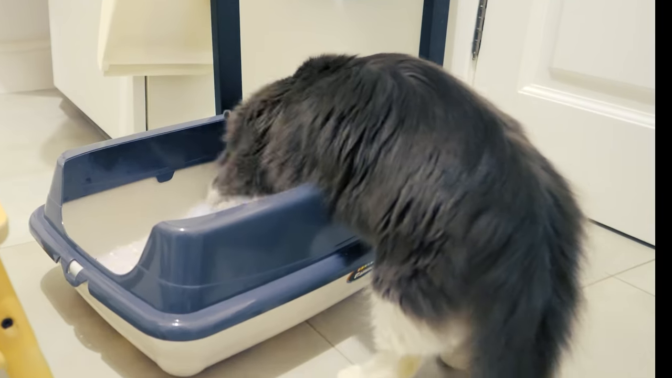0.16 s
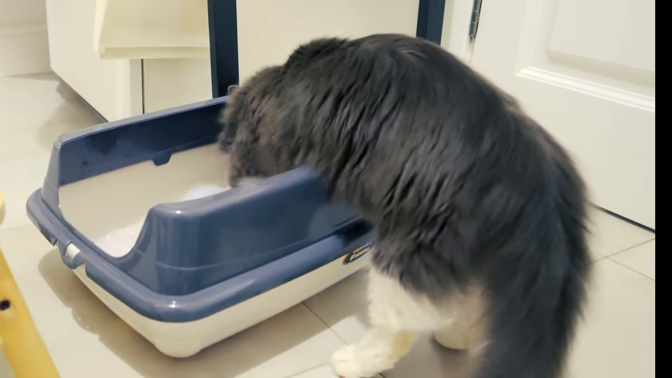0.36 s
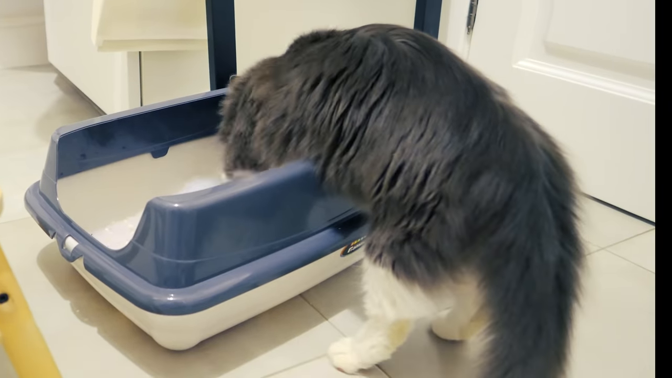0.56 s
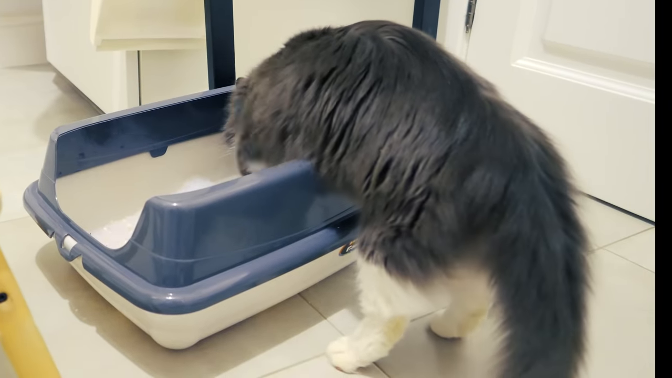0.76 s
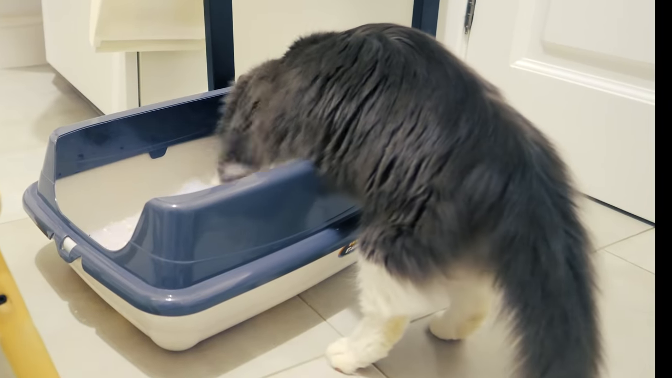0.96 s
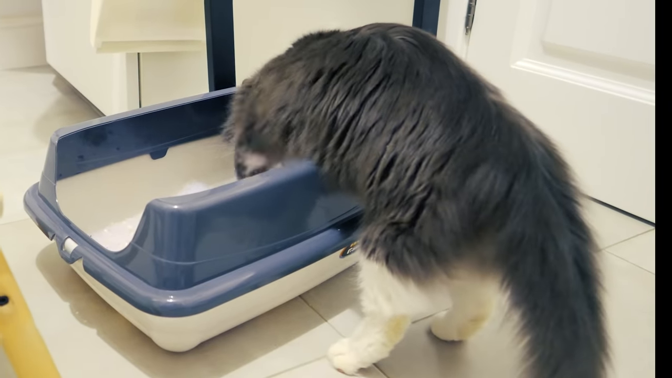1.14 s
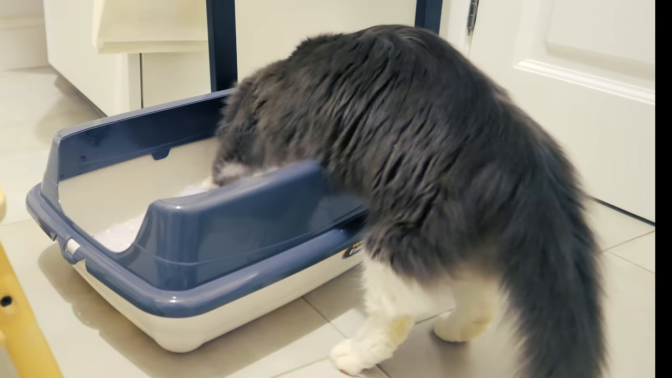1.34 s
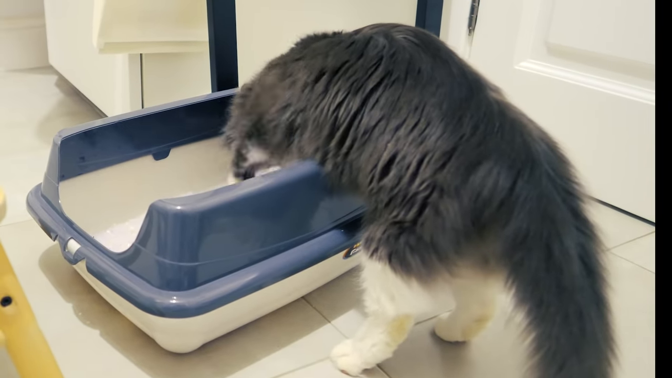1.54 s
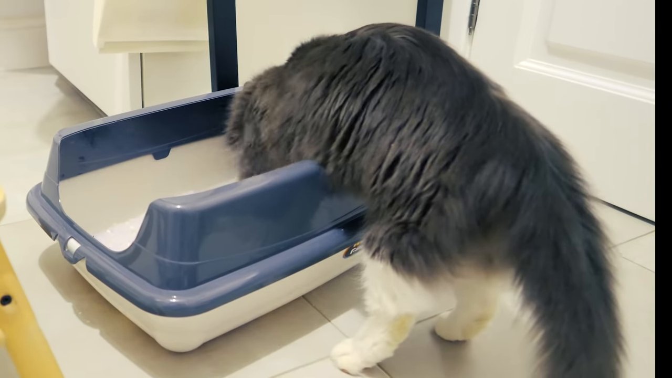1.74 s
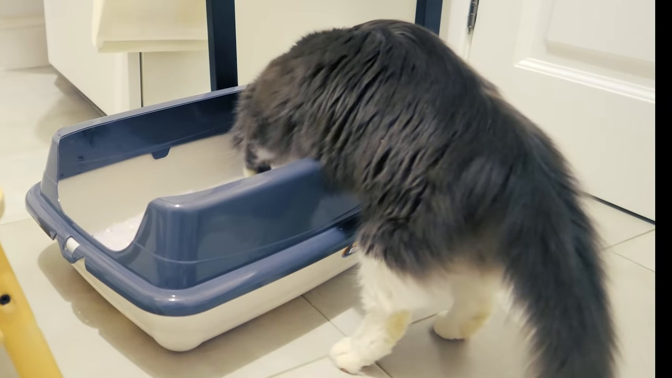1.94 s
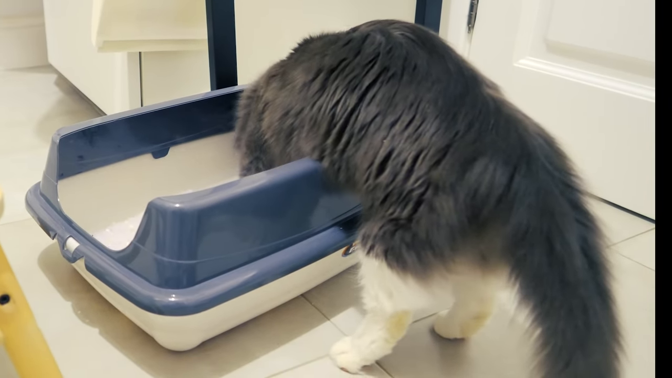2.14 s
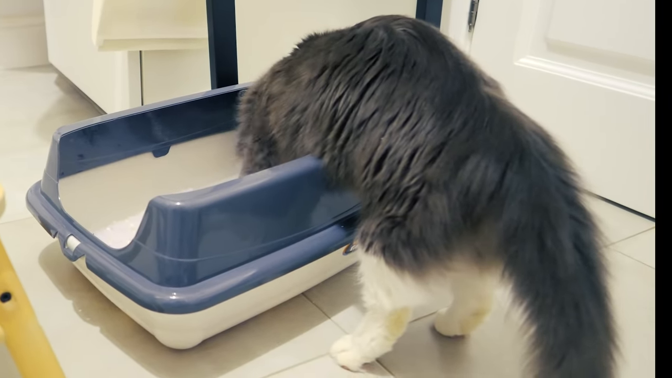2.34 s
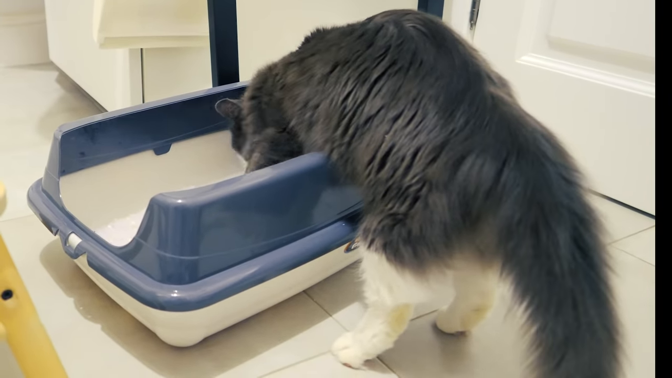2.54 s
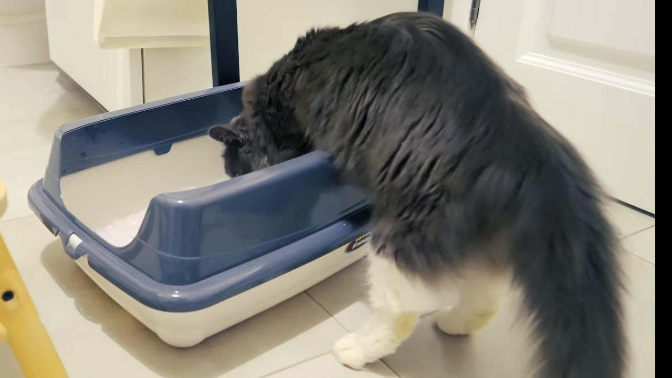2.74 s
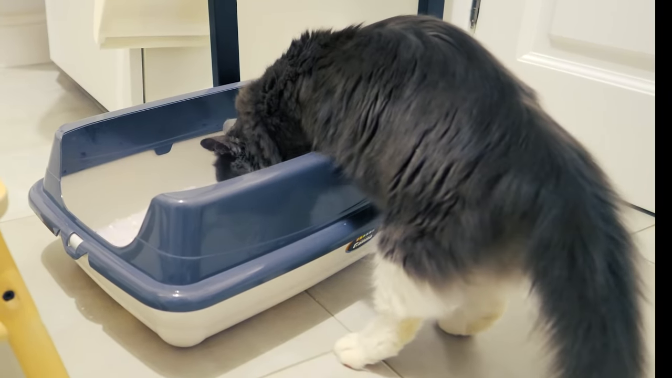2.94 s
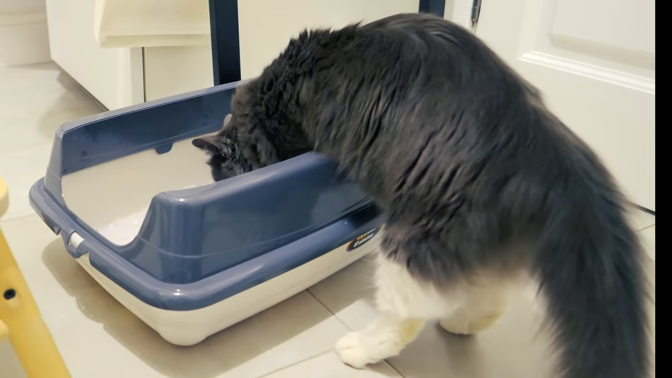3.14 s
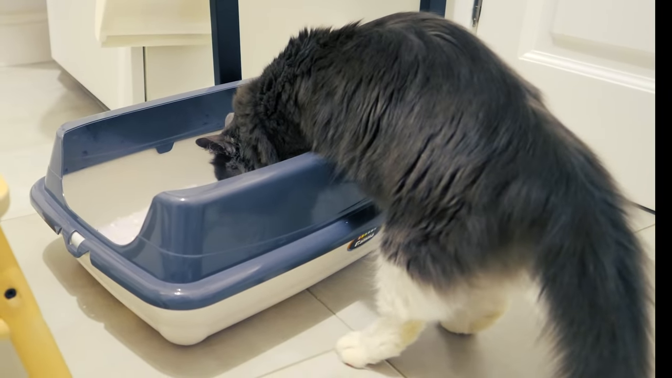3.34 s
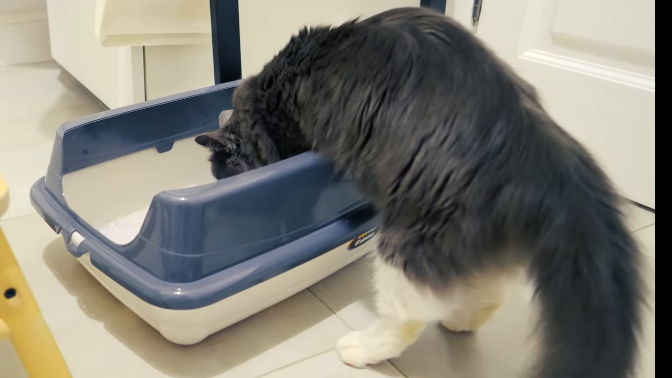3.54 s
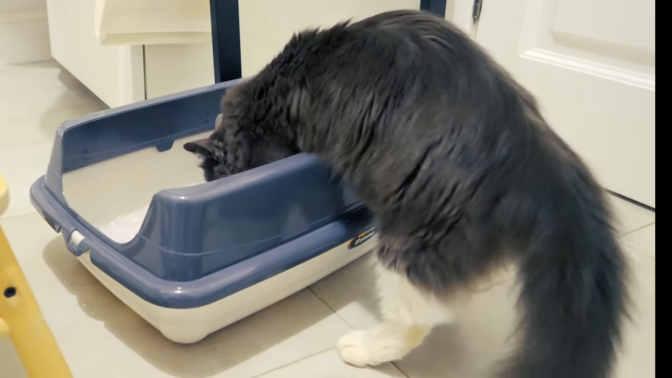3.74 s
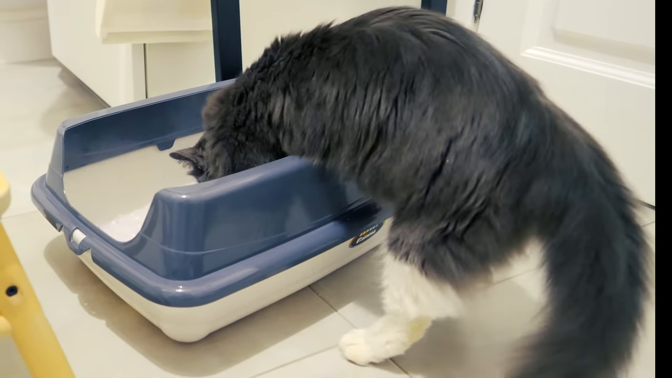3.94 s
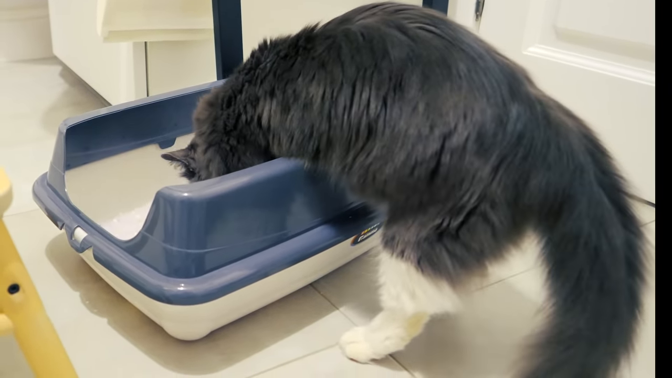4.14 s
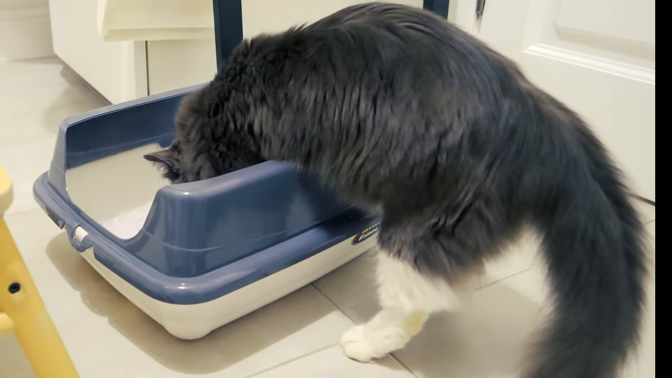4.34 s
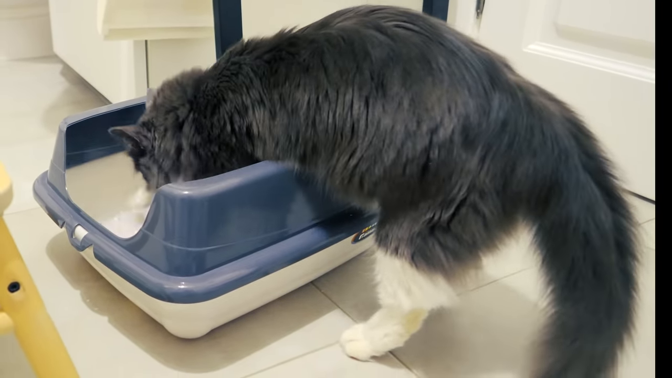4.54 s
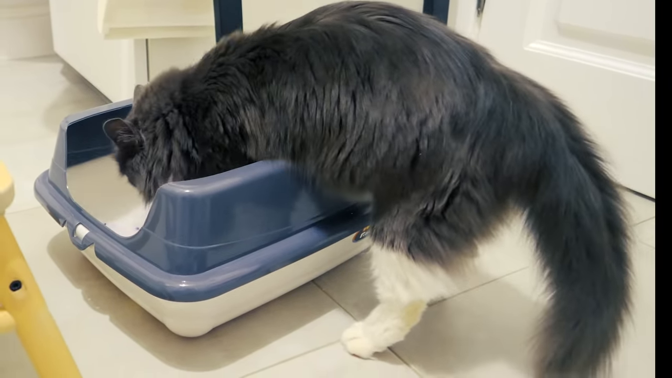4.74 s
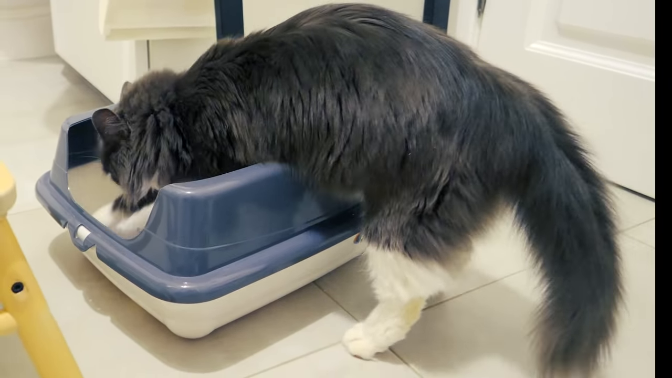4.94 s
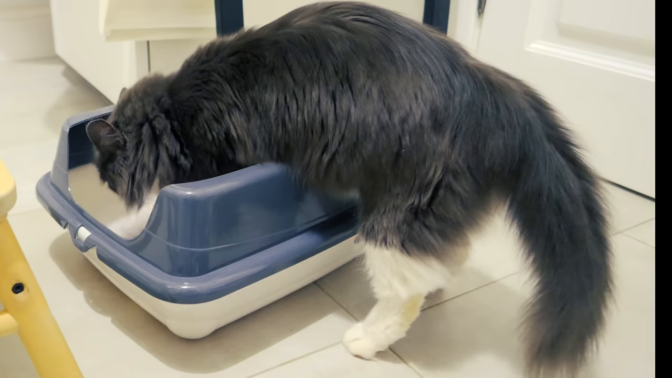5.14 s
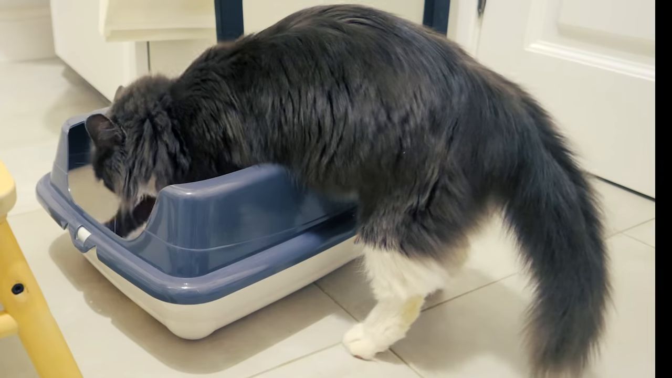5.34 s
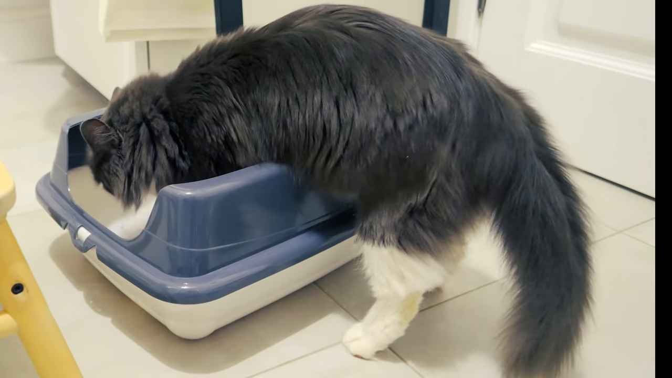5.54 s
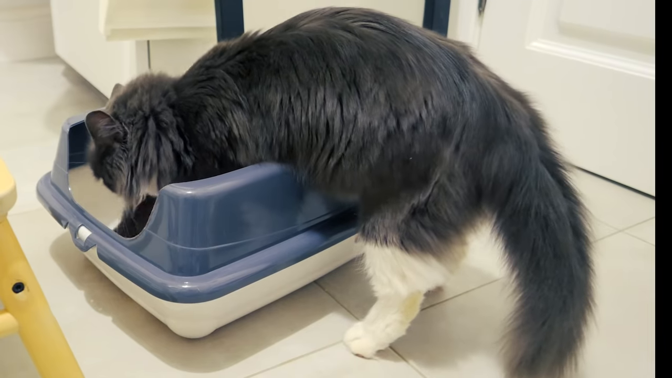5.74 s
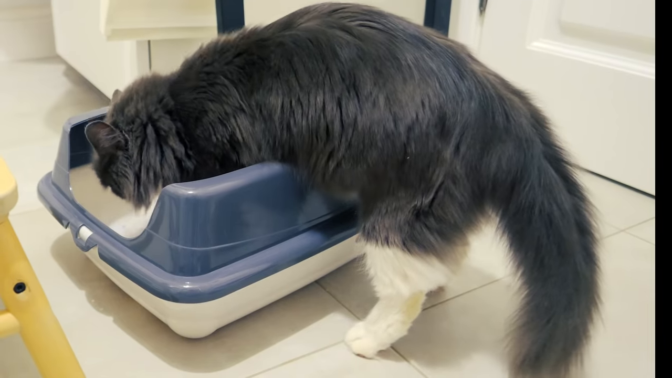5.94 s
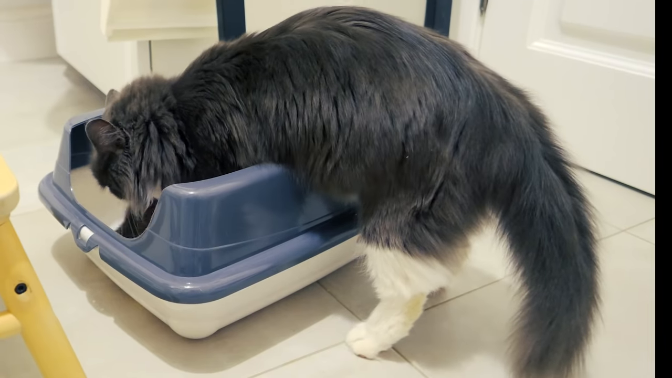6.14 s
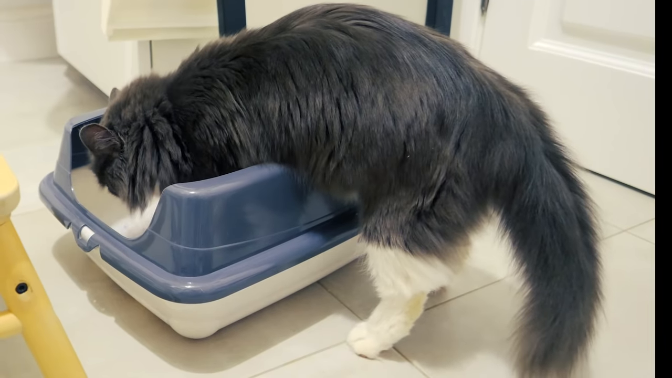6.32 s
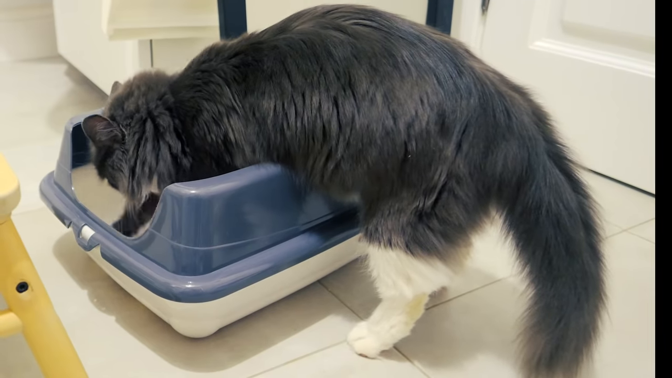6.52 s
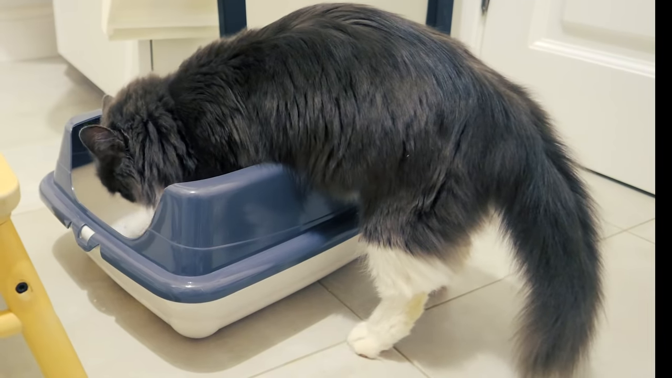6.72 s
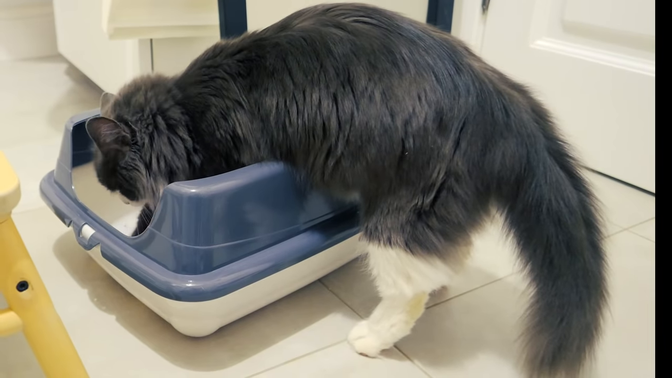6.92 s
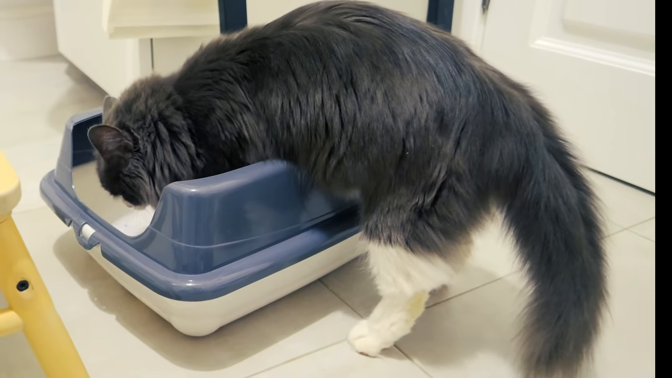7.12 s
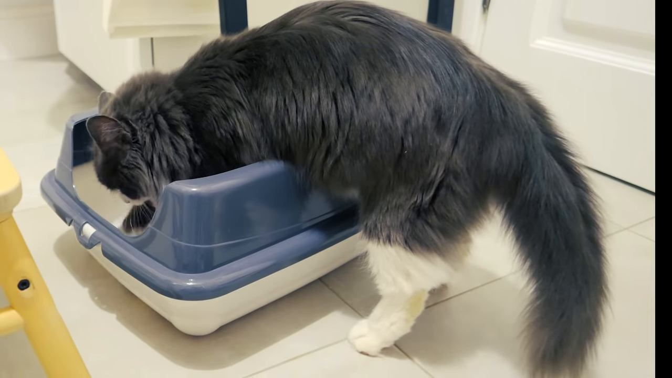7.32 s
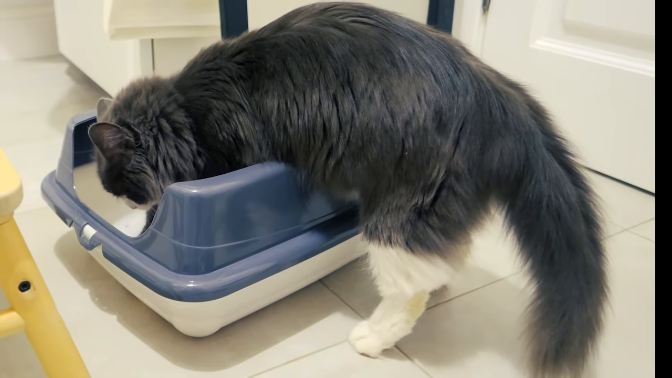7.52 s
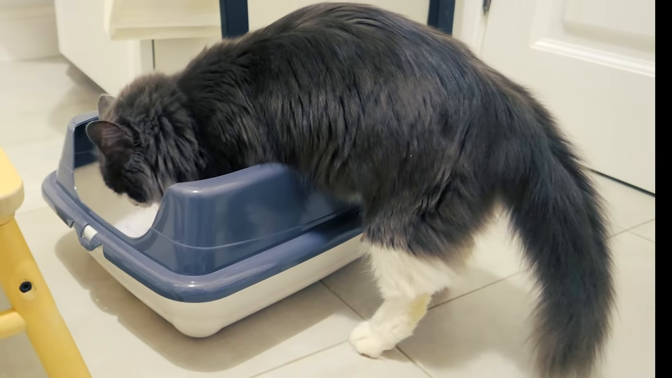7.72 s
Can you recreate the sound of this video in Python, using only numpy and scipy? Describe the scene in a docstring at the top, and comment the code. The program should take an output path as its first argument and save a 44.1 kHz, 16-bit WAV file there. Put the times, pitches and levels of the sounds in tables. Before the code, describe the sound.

A cat's paws rake dry, glassy granules about three times a second, with low hollow knocks from the plastic tray. It stops for over a second, sniffing softly while stray crystals tick, then tentatively prods and digs again, louder and more irregular, with hard cracks. Heard close in stereo, in a small reflective indoor room with a quiet background.

```python
"""Cat digging in crystal litter.

A cat digs in a plastic tray in a small tiled room, pauses to sniff and nudge, then digs at the far end.
Strokes are dense random collisions; pressure drives the tray's low modes, crushing adds bright treble.
Paw landings and single snaps are fading grain showers, sniffs are shaped noise; hard walls add a short tail.
"""
import sys
import numpy as np
from scipy import signal
from scipy.fft import rfft, irfft, next_fast_len
from scipy.io import wavfile

SR = 44100
rng = np.random.default_rng(int(sys.argv[2]) if len(sys.argv) > 2 else 0)


def int16_out(signal):
    """Quantize to a 16-bit WAV file."""
    q = np.round(np.clip(np.atleast_2d(signal).T, -1, 1) * 32767)
    wavfile.write(sys.argv[1], SR, q.astype(np.int16))


N = 347067
T = np.arange(N) / SR

# All source levels are before the output gain in scene().
# Still room air. Each row: frequency in Hz, relative density in dB per Hz.
AIR_COLOUR = [(30, -27), (60, -40), (100, 0), (300, 1), (580, -0.5), (1140, -7), (1650, -31), (3070, 1),
              (4300, -11.5), (9600, -12), (15000, -23)]
AIR_DB = -69.5
# Room decay. Each row: frequency in Hz, t60 in seconds.
ROOM_T60 = [(150, 0.51), (1000, 0.51), (3000, 0.3), (8000, 0.38), (15000, 0.31)]
# Difference between the two ports. Each row: frequency in Hz, side minus mid in dB.
PORT_WIDTH = [(30, 10), (100, -12), (260, -15.5), (550, -10), (1100, -4), (2400, -5.5), (5000, -3.5),
              (9000, -7), (13000, 0.5)]
# Sniffs. Each row: centre in seconds, level in dB, Gaussian half length in seconds.
SNIFFS = [(2.862, -64, 0.016), (3.058, -64, 0.023), (3.14, -61, 0.019), (3.233, -58.5, 0.016),
          (3.336, -52, 0.013)]
# Air drawn through the small nose. Each row: frequency in Hz, relative level in dB.
NOSE_COLOUR = [(100, -24), (350, -1), (900, -2.5), (1600, 1), (2300, -4), (3000, 3), (4200, -8),
               (7000, -19), (15000, -30)]
# One collision in the bed. Each row: frequency in Hz, relative level in dB.
LITTER_COLOUR = [(40, -56), (100, -23.5), (195, -20), (260, -8), (480, -13.5), (900, -7.5), (1600, 0),
                 (3100, 2.5), (4300, -5), (7000, -12), (9500, -13), (12000, -19.5), (15500, -27.5)]
# Tray walls and the crystals on them. Each row: resonance in Hz, width in Hz, lift in dB.
WALL_MODES = [(355.5, 65, 5.5), (443, 22, 6.5), (913, 27, 6), (1165, 37, 1.5), (1154, 17, 0.5),
              (1301, 35, 3), (1510, 30, -2.5), (1745, 130, 2), (2220, 58, 0.5), (2475, 90, 2),
              (2660, 85, -1), (2920, 41, 1.5)]
# Tray floor. Each row: resonance in Hz, width in Hz, lift in dB at a drum share of 1.
DRUM_MODES = [(261.4, 67, 10), (314, 15.5, 11.5), (666, 224, 9.5)]
# Single crystals snap or drop. Each row: start in seconds, level in dB, bright crunch in relative dB,
# tray drive in relative dB, ring in Hz.
SNAPS = [(0.0568, -59, -4, -16, 3000), (0.2882, -47, 1, -8, 3000), (2.496, -43, -9, -9, 2530),
         (2.6222, -46, 5.5, -26, 3100), (2.6796, -48, -7, -23, 3030), (2.819, -51.5, 5.5, 3, 1630),
         (2.9164, -44, 8, 1, 3100), (3.1522, -51, 1, -1, 2900), (3.417, -43, 4, -7, 3020),
         (3.486, -42.5, 2, -14, 3120), (3.5336, -35, 5, -9, 2800), (3.6838, -47, 1, -10, 2670),
         (4.1865, -32.5, 7, -8, 2920), (4.2369, -29, 4, -29, 2930), (4.4672, -37, 6, -2, 2360),
         (5.3664, -30.5, -21, 10.5, 1990), (5.4319, -18.5, 1, 4.5, 2620), (6.2098, -21, 4, 1.5, 3130),
         (6.316, -21, -23, -19, 1700), (6.391, -19, 0, -18, 3000), (6.555, -39, 5.5, 5, 3080),
         (6.693, -27, 6, -31, 3870), (7.0904, -17, -1, 1, 1720), (7.4048, -31, -3, 5.5, 1820)]
# The paw lands or bears down. Each row: start in seconds, level in dB, bright crunch in relative dB,
# tray drive in relative dB.
PAWS = [(0.354, -40, -12, 13.5), (0.6775, -36.5, -19, 13), (0.9848, -26.5, 10.5, -11),
        (1.039, -29, -11, 12), (1.344, -29, 14.5, 6.5), (1.4026, -21.5, -8, 12.5), (1.6726, -25.5, 5, -19),
        (2.0721, -28, 9.5, 3), (2.0852, -30, 11, 7.5), (2.1317, -22, 0, -22), (2.177, -22, 5.5, -11),
        (2.2006, -24.5, 7, 5), (2.3408, -31, 2.5, -11), (3.9378, -24, -8, -38), (5.3907, -25, 6, 0),
        (5.7765, -20.5, -23, 5), (6.614, -40, 7, -16), (6.785, -37.5, -8, 13.5), (6.9833, -24, -6, 5.5)]
# Paw drags, and one faint long nudge of the nose in the pause. Each row: start in seconds,
# sinking-in in seconds, drag length in seconds, peak in dB, swell from first touch in dB,
# settling in dB per second, bright crunch in dB, push on the tray in dB, scrape on the tray floor in dB.
STROKES = [(0.349, 0.0097, 0.12, -35, 9, 136, 2, -0.5, 1), (0.681, 0.02, 0.11, -29, 9.5, 88, 0.5, 0, -2),
           (0.981, 0.018, .03, -31, 2.5, 95, 5.5, 2, 1), (1.077, 0.015, 0.11, -31, 0.5, 85, 0.5, -4, -4),
           (1.343, 0.018, 0.049, -24.5, 3, 77.5, 4, -0.5, -1),
           (1.678, 0.023, 0.12, -34.5, 11, 122, 4, 1.5, 2.5),
           (1.859, 0.047, 0.061, -33, 4.5, 109, 1, -0.5, -2.5),
           (2.067, .005, 0.13, -35.5, 12.5, 148, 5.5, 1, 1),
           (2.355, 0.0036, 0.027, -51.5, 1, 85, 3.5, -23, -2), (2.94, .04, 0.62, -66, 11, 30, 4, 0, 2.5),
           (3.801, 0.017, .012, -41, -1.5, 89, -0.5, -10.5, -4),
           (3.918, .006, 0.016, -38.5, 9, 132, 1.5, -9.5, -8),
           (4.047, .004, 0.011, -51.5, -2, 72, 9, -7, -9), (4.128, .01, 0.016, -43, 3.5, 170, 4.5, -15, -4),
           (4.19, 0.012, 0.097, -50, 5, 73, 6, -3, -2), (4.304, 0.0091, 0.017, -40.5, 6, 151, 5, -8, -4),
           (4.476, 0.018, .03, -54, 10, 50, 6, -1, 0), (4.655, 0.081, .04, -47.5, 4, 100, 4.5, -9, -9),
           (4.7, 0.024, 0.076, -25, 14, 151, 0.5, -3, -1.5), (4.948, 0.053, 0.08, -29, 12.5, 81, 4.5, 2, 2),
           (5.099, 0.022, 0.036, -22.5, 10.5, 132, 0.5, -3.5, -2),
           (5.371, .005, 0.15, -26.5, 15.5, 114.5, 1, -2, -0.5),
           (5.769, 0.0087, 0.023, -32.5, 10, 110, 6, -2, 4.5), (5.87, .03, 0.075, -31, 2, 122, 0, -1, 0.5),
           (6.163, 0.059, 0.21, -36, 4, 105, -0.5, -3, 1.5),
           (6.613, 0.01, 0.16, -35.5, 7.5, 124, 1, -7.5, -1), (6.994, 0.005, .008, -38, 2.5, 93, 4, 4, 5),
           (7.04, .02, 0.029, -29.5, 1.5, 63, 0, -3.5, 3), (7.119, 0.034, 0.038, -28, 2, 280, 5, -3.5, -1),
           (7.427, 0.02, 0.074, -40.5, -0.5, 104, 1, -5.5, 4.5),
           (7.68, 0.061, 0.12, -41.5, 8, 176, -4.5, -8, 2)]
# Fine crumbs shifting between strokes: level in dB, bright crunch in dB, push on the tray in dB,
# scrape on the tray floor in dB.
CRUMBS = (-75, -4, -4.5, -4)

CRUNCH_FADE_DB = 2.5  # crystals crush most at first touch, less as they start to flow
EARLY_SCRAPE_DB = 0.5  # extra scrape at first touch, gone by the end of the drag
LEAN_DB = 0.5  # the cat leans harder on the tray as it drags
LIFT_AFTER_S, UNLOAD_DB_PER_S = 0.095, 33  # after the drag the cat lifts and its weight leaves the tray
SURGE_DB, SURGE_PER_S = 1.5, 28  # the crystals give way in clumps
TOP_HZ = 15600


def undb(db):
    """Decibels to gain."""
    return 10 ** (np.asarray(db) / 20)


def along(points, hz):
    """Read (Hz, value) points on a log-frequency axis."""
    f, value = np.transpose(points)
    return np.interp(np.log(hz + 1e-3), np.log(f), value)


def shape(x, gain):
    """Filter by a gain that is a function of frequency."""
    size = next_fast_len(2 * x.shape[-1])
    spectrum = rfft(x, size) * gain(np.fft.rfftfreq(size, 1 / SR))
    return irfft(spectrum, size)[..., :x.shape[-1]]


def one_band(x, centres_hz, centre_hz):
    """Keep one band that crossfades linearly in log frequency into its neighbours."""
    slope = [(f, float(f == centre_hz)) for f in centres_hz]
    return shape(x, lambda hz: along(slope, hz))


def ports(mid, side):
    """Diffuse sound at two close microphone ports; their difference varies with frequency."""
    side = shape(side, lambda hz: undb(along(PORT_WIDTH, hz)))
    return np.array([mid + side, mid - side])


def air():
    """Faint steady room noise."""
    noise = ports(*rng.standard_normal((2, N)))
    x = shape(noise, lambda hz: undb(along(AIR_COLOUR, hz)))
    return x * undb(AIR_DB) / x.std()


def room(early_db=-5, early_s=0.011, tail_db=-5.5, shadow_hz=7500):
    """Direct sound dulled by the tray's rim, quick reflections from tray and floor, then the room tail."""
    t = T[:SR // 2]
    noise = rng.standard_normal((2, len(t)))
    centres_hz = [f for f, _ in ROOM_T60]
    tail = 0
    for f, t60_s in ROOM_T60:
        decay = np.exp(-np.log(1000) * t / t60_s) * (t > .006)
        tail = tail + one_band(noise, centres_hz, f) * decay
    early = rng.standard_normal((2, len(t))) * np.exp(-t / early_s) * (t > .0007)
    early *= undb(early_db) / np.linalg.norm(early[0])
    tail *= undb(tail_db) / np.linalg.norm(tail[0])
    direct = np.exp(-2 * np.pi * shadow_hz * t)
    return direct / direct.sum() + ports(*(early + tail))


def wander(dry, count=7, moves_per_s=23):
    """The sounding spot cycles about the tray; each spot has its own pattern of reflections."""
    place = np.floor(T * moves_per_s) % count
    wet = 0
    for spot in range(count):
        here = dry * (place == spot)
        wet = wet + signal.fftconvolve(here[None], room(), axes=1)[:, :N]
    return wet


def mode_lift_db(modes, hz):
    """Summed resonance peaks in dB."""
    return sum(lift_db / (1 + (2 * (hz - f) / width_hz) ** 2) for f, width_hz, lift_db in modes)


def ring(drum_share, size=8192):
    """Causal response of the litter bed and tray to one collision, with unit energy."""
    hz = np.fft.rfftfreq(size, 1 / SR)
    drum_db = drum_share * mode_lift_db(DRUM_MODES, hz)
    response_db = along(LITTER_COLOUR, hz) + drum_db + mode_lift_db(WALL_MODES, hz)
    # minimum phase by folding the cepstrum
    cepstrum = irfft(np.log(undb(response_db)))
    cepstrum[1:size // 2] *= 2
    cepstrum[size // 2 + 1:] = 0
    response = irfft(np.exp(rfft(cepstrum)))
    return response / np.linalg.norm(response)


def grains(rate_per_s, spread_db):
    """Random impulses, many small and a few large; mean power 1 at any rate."""
    chance = np.clip(rate_per_s / SR, 1e-4, 1)
    size = undb(spread_db * np.minimum(rng.standard_normal(N), 2.5))
    size *= rng.choice([-1, 1], N) / np.sqrt(np.mean(size ** 2))
    return size * (rng.random(N) < chance) / np.sqrt(chance)


def walk(rate_per_s):
    """Smooth chance with a spread near 1."""
    knots = rng.standard_normal(4096)
    return np.interp(T * rate_per_s, np.arange(len(knots)), knots)


def collide(force, crunch_db, push_db, scrape_db, scatter_db):
    """Colour every collision: lows follow the push on the tray, mids the scrape, highs the crushing."""
    # centre in Hz: level in dB
    bands = {260: push_db, 420: push_db, 750: (push_db + scrape_db) / 2, 1150: scrape_db,
             2100: 0, 3300: 0, 5200: .7 * crunch_db, 8500: crunch_db, 13000: 1.15 * crunch_db}
    out = 0
    for centre_hz, db in bands.items():
        scattered = force * undb(db + scatter_db * rng.standard_normal(N))
        out = out + one_band(scattered, list(bands), centre_hz)
    return out


def bursts(table, decay_s):
    """Each blow is a fading shower of crystals; also returns its colour, held until the next blow."""
    shower, crunch_db, push_db = np.zeros((3, N))
    for s, db, blow_crunch_db, blow_push_db, *_ in sorted(table):
        i = int(s * SR)
        shower[i:] += undb(db) * np.exp(-T[:N - i] / decay_s)
        crunch_db[i:], push_db[i:] = blow_crunch_db, blow_push_db
    return shower * grains(13000, spread_db=3.5), crunch_db, push_db


def sniffs():
    """A quick run of soft puffs through the cat's nose: shaped noise under Gaussian swells."""
    flow = sum(undb(db) * np.exp(-((T - s) / half_s) ** 2 / 2) for s, db, half_s in SNIFFS)
    hiss = shape(rng.standard_normal(N), lambda hz: undb(along(NOSE_COLOUR, hz)))
    return flow * hiss / hiss.std()


def trickle(rate_per_s=30, level_db=-72, crunch_db=3, push_db=-12, scrape_db=-6):
    """Loose crystals tumble one by one down the dug slopes."""
    force = undb(level_db) * grains(rate_per_s, spread_db=8.5)
    return collide(force, crunch_db, push_db, scrape_db, scatter_db=2.5)


def snaps(rattle_db=-4.0, tick_db=-10, tick_s=0.0028):
    """One crystal gives way with a tick at its own pitch; its neighbours rattle for a few milliseconds."""
    ticks, t = np.zeros(N), T[:SR // 20]
    for s, db, _, _, hz in SNAPS:
        i = int(s * SR)
        tick = np.sin(2 * np.pi * hz * t) * np.exp(-t / tick_s)
        ticks[i:i + len(t)] += undb(db + tick_db) * tick
    force, crunch_db, push_db = bursts(SNAPS, decay_s=0.0032)
    rattle = collide(force, crunch_db, push_db, push_db / 2, scatter_db=4.5)
    return ticks + undb(rattle_db) * rattle


def paws(scrape_share=0.48, knock_db=3):
    """A landing paw crushes a patch of crystals, knocks on the tray floor and thumps the tray."""
    force, crunch_db, push_db = bursts(PAWS, decay_s=0.005)
    scrape_db = knock_db + scrape_share * push_db
    return collide(force, crunch_db, push_db, scrape_db, scatter_db=3.5)


def strokes():
    """Strokes swell during the drag, then the crystals settle; returns level, crunch, push, scrape in dB."""
    crumbs_db, *colour_db = CRUMBS
    power = np.full(N, undb(crumbs_db) ** 2)
    colour = np.outer(colour_db, power)  # power-weighted, so overlapping strokes average
    for s, sink_s, drag_s, db, swell_db, settle_db_per_s, crunch_db, push_db, scrape_db in STROKES:
        span = slice(int((s - sink_s) * SR), int((s + 1) * SR))
        t = T[span] - s
        contact = np.clip(1 + t / sink_s, 0, 1)
        ahead = np.clip(1 - t / drag_s, 0, 1)  # share of the drag still to come
        after_s = np.maximum(t - drag_s, 0)
        level_db = db - swell_db * ahead ** 2 - settle_db_per_s * after_s
        stirred = (contact * undb(level_db)) ** 2
        unload_db = UNLOAD_DB_PER_S * np.maximum(after_s - LIFT_AFTER_S, 0)
        power[span] += stirred
        colour[:, span] += stirred * np.array([crunch_db + CRUNCH_FADE_DB * ahead,
                                               push_db - LEAN_DB * ahead - unload_db,
                                               scrape_db + EARLY_SCRAPE_DB * ahead])
    return 10 * np.log10(power), *(colour / power)


def digging(slip_db=1.56, full_rate_per_s=16000, thinning=.33,
            lump_db=-9, lump_rate_per_s=130, lump_dull_db=12):
    """Paw, or once the nose, moves in small slips; stronger strokes stir more, a few big crystals clack dully."""
    level_db, crunch_db, push_db, scrape_db = strokes()
    rate_per_s = full_rate_per_s * undb(thinning * (level_db - level_db.max()))
    drag = undb(level_db + slip_db * walk(90) + SURGE_DB * walk(SURGE_PER_S))
    fine_force = drag * grains(rate_per_s, spread_db=4)
    fine = collide(fine_force, crunch_db, push_db, scrape_db, scatter_db=3.5)
    lump_force = drag * grains(lump_rate_per_s, spread_db=5.0)
    lumps = collide(lump_force, crunch_db - lump_dull_db, push_db, scrape_db, scatter_db=2.5)
    return fine + undb(lump_db) * lumps


def scene(start_pan_db=0.0, end_pan_db=0.97, gain_db=-2, middle_drum_share=0.99, end_drum_share=0.4):
    """Contacts ring tray and room; the cat works from the middle to the left end, where the floor is stiffer."""
    contacts = wander(digging() + paws() + snaps() + trickle())
    at_end = np.interp(T, [3.6, 4.8], [0, 1])
    middle = signal.fftconvolve(contacts * (1 - at_end), ring(middle_drum_share)[None], axes=1)
    end = signal.fftconvolve(contacts * at_end, ring(end_drum_share)[None], axes=1)
    nose = signal.fftconvolve(sniffs()[None], room(), axes=1)
    pan_db = start_pan_db + at_end * (end_pan_db - start_pan_db)  # left minus right
    gains = undb(gain_db + np.array([pan_db, -pan_db]) / 2)
    return (middle[:, :N] + end[:, :N] + nose[:, :N]) * gains + air()


def record(dry):
    """A steep elliptic low-pass removes the top of the treble."""
    low_pass = signal.ellip(10, .2, 80, TOP_HZ, fs=SR, output="sos")
    return signal.sosfilt(low_pass, dry)


dry = scene()
out = record(dry)
int16_out(out)
```